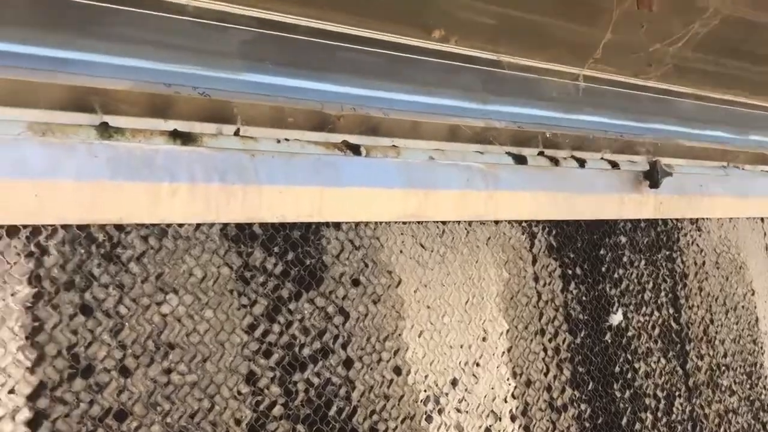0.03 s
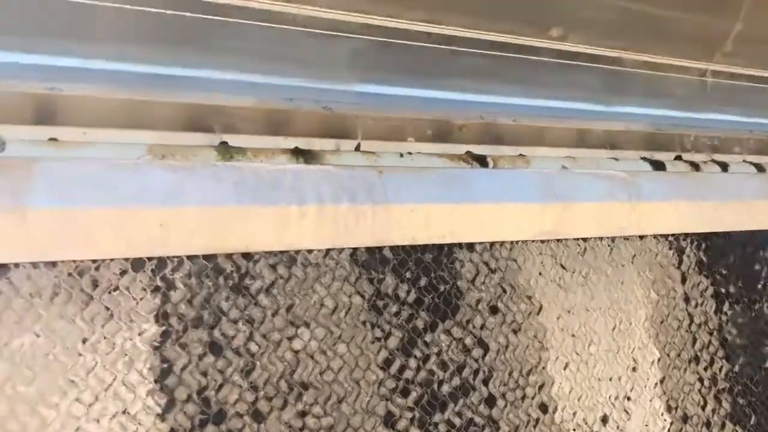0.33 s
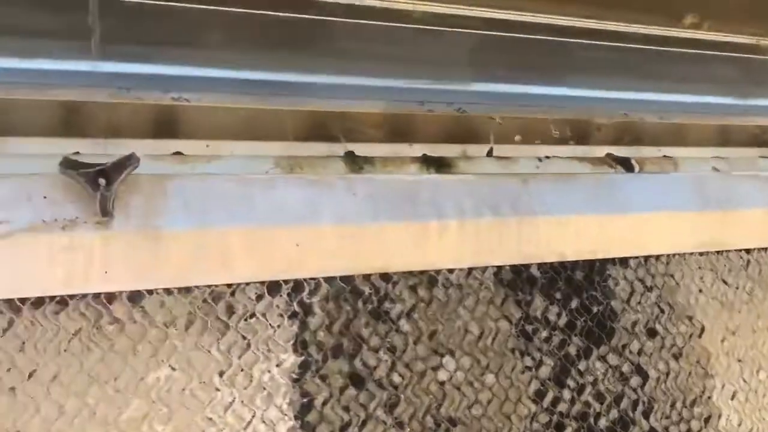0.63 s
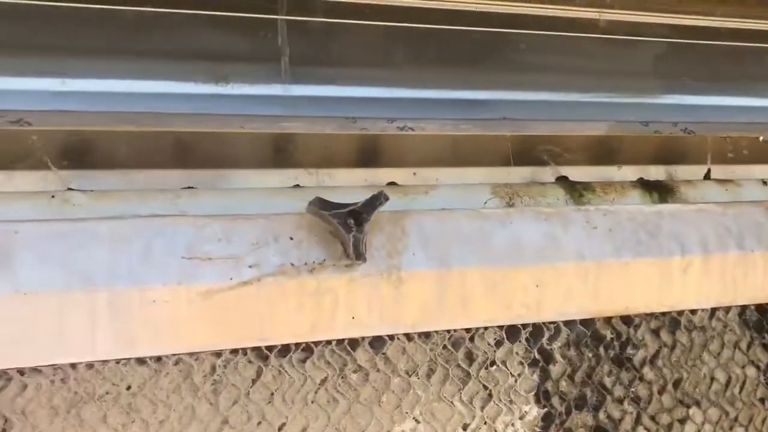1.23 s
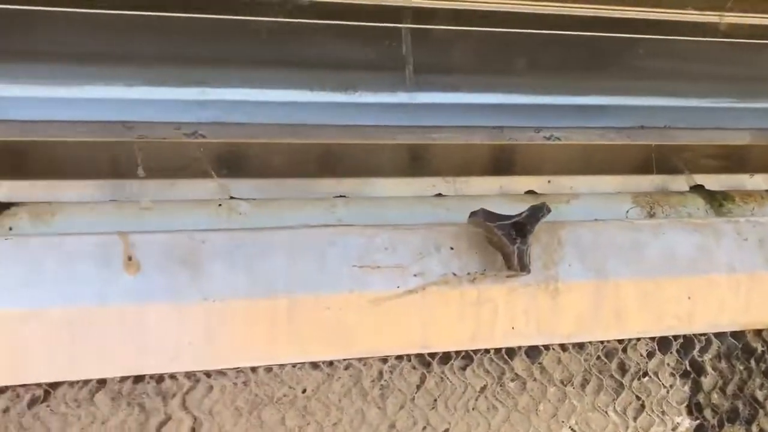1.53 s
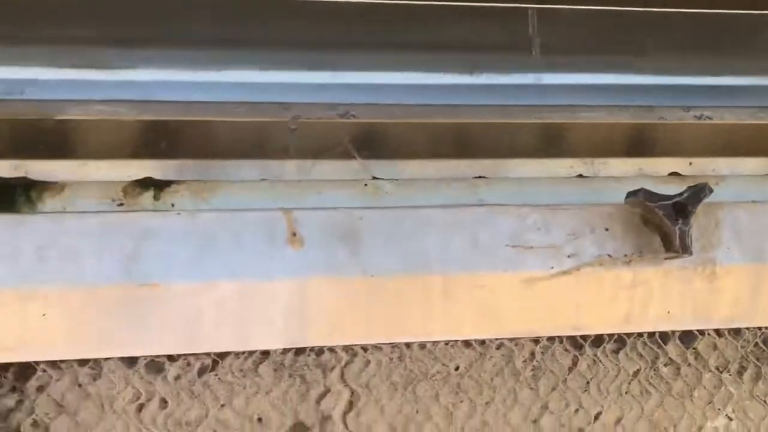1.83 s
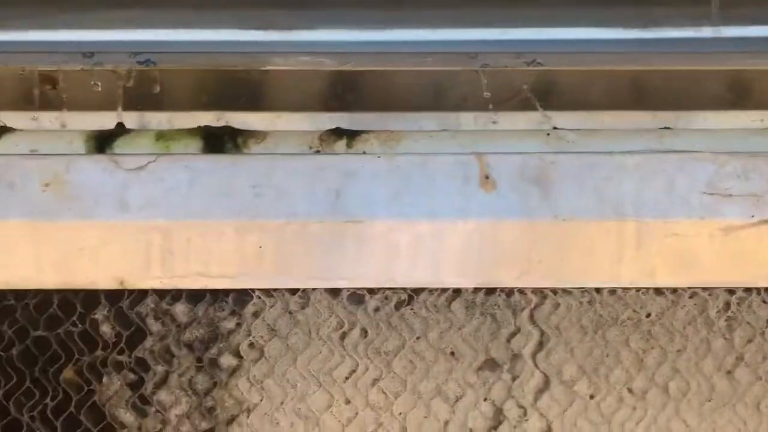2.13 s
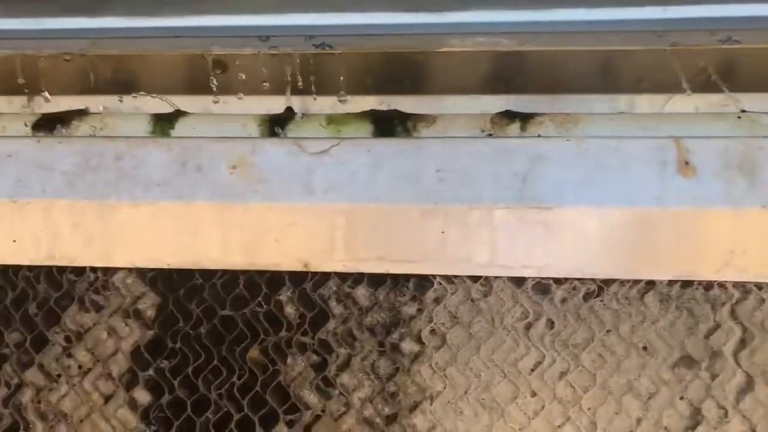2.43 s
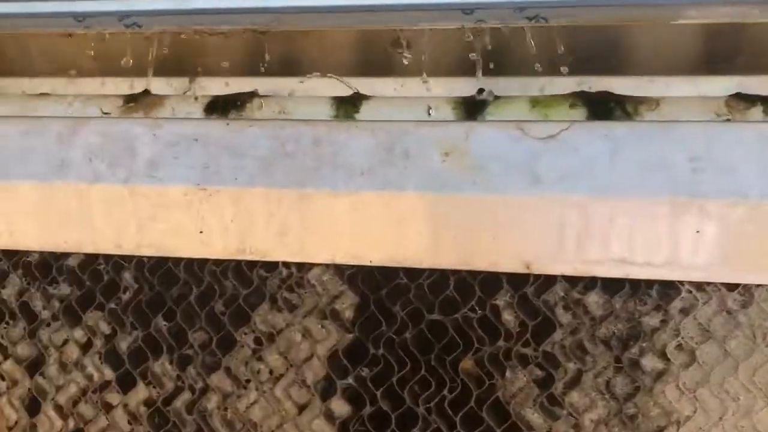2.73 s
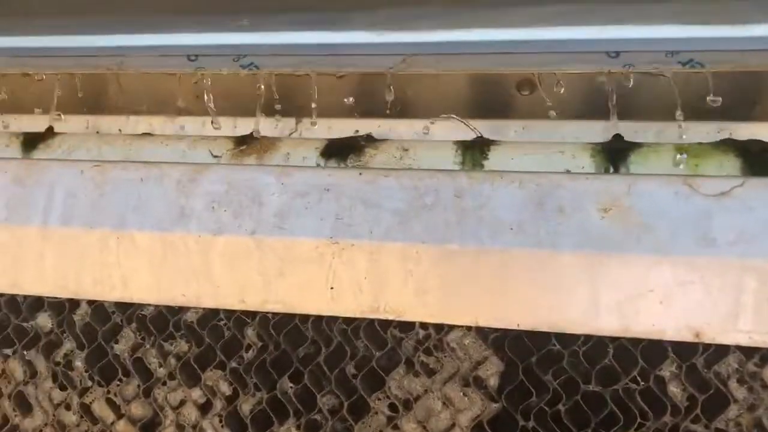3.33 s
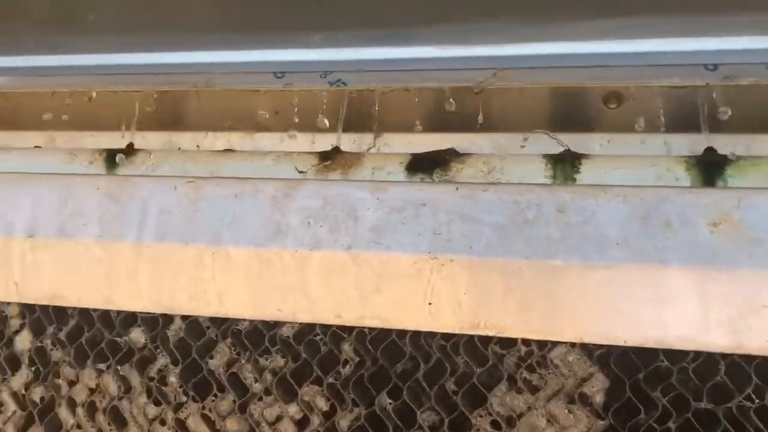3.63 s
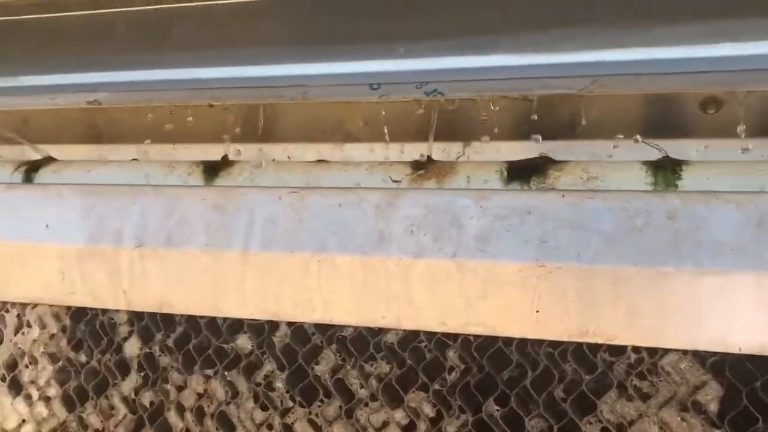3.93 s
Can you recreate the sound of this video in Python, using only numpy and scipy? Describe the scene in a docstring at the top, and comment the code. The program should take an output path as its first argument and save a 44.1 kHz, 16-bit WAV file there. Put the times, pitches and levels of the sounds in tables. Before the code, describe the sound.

Low wind thumps hit a microphone close to a farm building's wet cooling pads, die down, then build into a strong rumble. Underneath are a rhythmic fan rub, a soft airy hiss, a few faint squeaks and small drips.

```python
"""Wind buffets a microphone beside the wet cooling pads of a ventilated farm building.
Turbulent pressure at the microphone's port comes in puffs, then in a long gust that works the limiter.
Behind it a rasp, probably a fan drive rubbing, swells once per turn. Air and water hiss through
the pads, drops tick and splash, and a few faint squeaks glide in pitch."""
import sys
import numpy as np
from scipy import signal
from scipy.fft import rfft, irfft
from scipy.io import wavfile
from scipy.ndimage import uniform_filter1d, minimum_filter1d

SR = 44100
rng = np.random.default_rng(int(sys.argv[2]) if len(sys.argv) > 2 else 0)


def to_wav(sig):
    """Store sig (one row per channel, or 1-D mono) as 16-bit WAV at the path in sys.argv[1].

    Samples outside -1..1 are clipped; the rate is SR.
    """
    pcm = np.clip(np.atleast_2d(sig), -1, 1) * 32767
    pcm = np.round(pcm).astype(np.int16)
    wavfile.write(sys.argv[1], SR, pcm.T)  # frames by channels


N = 176400
TIME = np.arange(N) / SR


def from_db(db):
    """Amplitude grows tenfold for every 20 dB."""
    return 10 ** (np.asarray(db) / 20)


def rms_one(x):
    """Normalisation to unit rms."""
    return x / np.sqrt(np.mean(x ** 2) + 1e-20)


def in_time(rows):
    """Linear interpolation of a table at every sample."""
    return np.interp(TIME, *np.transpose(rows))


def at_hz(rows, hz):
    """Interpolation of a table on a logarithmic frequency axis."""
    freqs, values = np.transpose(rows)
    return np.interp(np.log(hz), np.log(freqs), values)


def cut(x, hz, kind, order=2):
    """A Butterworth filter, maximally flat in its passband."""
    sos = signal.butter(order, np.clip(hz, 10, .45 * SR), kind, fs=SR, output="sos")
    return signal.sosfilt(sos, x + 1e-18)


def drift(corner_hz):
    """Low-passed noise gives a random fluctuation of unit rms."""
    pole = np.exp(-80 * np.pi * corner_hz / SR)
    slow = signal.lfilter([1], [1, -2 * pole, pole * pole], rng.standard_normal(N // 40 + 2002))[2000:]
    return np.interp(np.arange(N) / 40, np.arange(len(slow)), rms_one(slow))


def hiss(spectrum):
    """Spectral shaping colours white noise; unit rms."""
    hz = np.maximum(np.arange(N // 2 + 1) * SR / N, 1)
    return rms_one(irfft(rfft(rng.standard_normal(N)) * from_db(at_hz(spectrum, hz)), N))


def resonance(hz, width_hz):
    """A randomly driven resonance gives narrow-band noise, whose centre may move; unit rms."""
    a, b = cut(rng.standard_normal((2, N)), width_hz / 2, "low")
    phase = 2 * np.pi * np.cumsum(hz * np.ones(N)) / SR
    return rms_one(a * np.cos(phase) + b * np.sin(phase))


def evened(x, span_s):
    """Division by the running rms flattens the envelope."""
    return x / np.sqrt(np.abs(uniform_filter1d(x ** 2, max(int(span_s * SR), 2))) + 1e-12)


def steady_band(low_hz, high_hz, span_s):
    """Band-limited noise with a flattened envelope."""
    return evened(cut(rng.standard_normal(N + SR), [low_hz, high_hz], "band", order=3)[SR:], span_s)


def burst(start, length, rise_s, fall_s):
    """An envelope of linear attack, hold and exponential decay."""
    age = TIME - start
    return np.clip(age / rise_s, 0, 1) * np.exp(-np.maximum(age - length, 0) / fall_s)


# Each row: frequency in Hz, relative spectral density of the hiss in dB.
PAD_SPECTRUM = [(60, 23), (200, 8), (500, 5.5), (1000, 3.5), (2000, 2), (3000, 2), (4000, 3), (6500, -9.5),
                (8200, -14), (12000, -29.5), (15500, -26)]
# Each row: time in seconds, level of the spray near the leaking pipe in dB.
SPRAY_LEVEL = [(0, -67), (.7, -76), (1.9, -74), (2.5, -68), (4, -71)]


def pads():
    """Flow noise: air and water hiss steadily through the pads, with fine spray on top."""
    spray = rms_one(cut(rng.standard_normal(N), [7500, 13500], "band"))
    return from_db(-46) * hiss(PAD_SPECTRUM) + from_db(in_time(SPRAY_LEVEL)) * spray


# Each row: start in seconds, level in dB, lower and upper band edges in Hz.
TICKS = [(.186, -45, 8000, 13500), (.76, -51, 11000, 14500), (.9, -55, 8000, 12760),
         (1.148, -43.5, 8200, 11300), (2.345, -45, 10500, 15500), (2.454, -38.5, 7900, 14400),
         (2.711, -38, 11500, 15800), (2.906, -45, 9500, 13000), (3.1, -46, 7000, 15000),
         (3.16, -49, 11000, 15500), (3.452, -48, 12500, 15800), (3.883, -43.5, 7000, 12500)]


def ticks():
    """Impact noise: each drop striking the gutter gives a brief, bright burst."""
    out = 0
    for start, db, low_hz, high_hz in TICKS:
        treble = cut(rng.standard_normal(N), low_hz, "high", order=6)
        band = rms_one(cut(treble, high_hz, "low", order=8))
        out += from_db(db) * np.tanh(band / 2) * burst(start, 0.006, rise_s=0.00078, fall_s=0.0028)
    return out


# Each row: start in seconds, level in dB, length in seconds, frequency in Hz.
SPLASHES = [(2.443, -44.5, 0.032, 4800), (3.116, -48, 0.026, 5770), (3.459, -43, .028, 5500)]


def splashes():
    """Small splashes radiate band-limited noise with a soft attack."""
    out = 0
    for start, db, length, hz in SPLASHES:
        band = rms_one(cut(rng.standard_normal(N), [hz * 0.81, hz * 1.07], "band"))
        out += from_db(db) * band * burst(start, length, rise_s=0.0086, fall_s=0.014)
    return out


# Each row: time in seconds, typical level of a drip in dB.
DRIP_LEVEL = [(0, -63), (1.8, -63), (2.6, -57), (4, -50)]
DRIPS_PER_S = 60


def patter():
    """Drips arrive as a Poisson process, louder as the leaking pipe comes near."""
    arrivals = rng.random(N) < DRIPS_PER_S / SR
    impacts = arrivals * from_db(in_time(DRIP_LEVEL) + 3 * rng.standard_normal(N))
    envelope = signal.lfilter([1], [1, -np.exp(-1 / (0.0056 * SR))], impacts + 1e-18)  # 5.6 ms decay
    return envelope * cut(rng.standard_normal(N), 5000, "high")


# Each row: start and length in seconds, first and last frequency in Hz, peak level in dB.
SQUEAKS = [(0.924, 0.038, 1420, 1246, -39), (0.944, 0.058, 1170, 737, -44), (1.055, 0.014, 705, 1220, -39),
           (1.056, 0.028, 1600, 1400, -41), (1.136, 0.043, 1570, 580, -40.5),
           (1.158, 0.026, 1750, 1340, -45)]


def squeaks():
    """Random frequency modulation roughens short gliding tones."""
    out, waver = 0, 1 + 0.059 * drift(223)
    for start, length, first_hz, last_hz, db in SQUEAKS:
        progress = np.clip((TIME - start) / length, 0, 1)
        hz = (first_hz + (last_hz - first_hz) * progress) * waver
        out += from_db(db) * np.sin(np.pi * progress) * np.sin(2 * np.pi * np.cumsum(hz) / SR)
    return out


TURNS_PER_S, FIRST_SWELL_S = 6.1, 0.066


def swell(rise_s, fall_s):
    """Incoherent sounds add in power: each turn's rub overlaps the tail of the one before."""
    age = (TIME - FIRST_SWELL_S) % (1 / TURNS_PER_S)
    ages = np.array([age, age + 1 / TURNS_PER_S])
    envelopes = np.clip(ages / rise_s, 0, 1) * np.exp(-np.maximum(ages - rise_s, 0) / fall_s)
    return np.hypot(*envelopes)


# Each row: frequency in Hz, relative spectral density of the rubbing in dB.
RASP_SPECTRUM = [(1200, -0.5), (2000, -1.5), (2900, 1), (3700, 3), (4400, 5), (5500, 0.5), (7000, 1.5),
                 (8200, -10.5), (10600, -10), (13000, -23), (15500, -37)]
# Each row: time in seconds, level of the broadband rubbing in dB as the listener moves.
RASP_LEVEL = [(0, -41), (.3, -43), (.65, -46), (1.0, -48.5), (1.6, -47.5), (2.0, -46.5), (2.5, -46),
              (3.2, -48), (4, -46.5)]
# The strongest spectral hump sinks as the listener walks. Each row: time in seconds, centre in Hz.
HUMP_HZ = [(0, 4500), (.45, 4120), (1.0, 3760), (1.8, 3550), (2.4, 3430), (4, 3500)]
# Each row: time in seconds, level of that hump in dB.
HUMP_LEVEL = [(0, -49), (.5, -49.5), (1.6, -46.5), (2.3, -49.5), (3.0, -50), (4, -50.5)]
# Each row: frequency and bandwidth in Hz, level in dB, rise and decay times in seconds.
METAL_MODES = [(3310, 53, -58, 0.071, 0.051), (3420, 200, -56, .035, 0.11), (6400, 370, -60.5, 0.039, 0.17),
               (10100, 81, -67.5, .006, 0.081), (10100, 990, -69.5, 0.022, 0.073),
               (15000, 1200, -71, .02, .06)]


def fan_rasp():
    """Friction noise swells once per turn and excites resonances of the metal; its level flickers."""
    friction = from_db(in_time(RASP_LEVEL)) * hiss(RASP_SPECTRUM)
    hump = from_db(in_time(HUMP_LEVEL)) * resonance(in_time(HUMP_HZ), width_hz=840)
    rasp = (friction + hump) * swell(rise_s=0.039, fall_s=0.078)
    for hz, width_hz, db, rise_s, fall_s in METAL_MODES:
        rasp += from_db(db) * resonance(hz, width_hz) * swell(rise_s, fall_s)
    return rasp * from_db(1.34 * drift(40))


# Each row: time in seconds, level in dB about which the rumble flutters.
RUMBLE_LEVEL = [(0, -24), (.12, -18.5), (.2, -33.5), (.3, -18), (.4, -34), (.58, -28), (.7, -42),
                (.95, -41), (1.3, -39.5), (1.75, -36.5), (2.05, -42.5), (2.28, -38.5), (2.38, -16.5),
                (2.6, -23.5), (2.85, -22), (3.2, -20.5), (4, -16)]


def rumble():
    """Large, slow eddies press on the port and give the lowest frequencies."""
    air = steady_band(51.8, 109, span_s=0.02)
    flutter_db = 4.5 * evened(drift(5.7), 0.29)
    return air * from_db(in_time(RUMBLE_LEVEL) + flutter_db)


# Each row: time of the centre in seconds, level in dB, width in seconds.
POPS = [(.004, -12.5, 0.0005), (0.073, -3.5, 0.0011), (.117, -4.5, 0.00061), (.201, -8, 0.00087),
        (.875, -12.5, 0.0011), (1.741, -10.5, 0.00087), (2.435, -9.5, 0.00091), (2.503, -12, 0.00037),
        (2.591, -15, 0.00051), (2.735, -8, 0.00063), (2.768, -4.5, 0.00052), (2.796, -8.5, 0.00038),
        (2.821, -3.5, 0.0003), (2.827, 2, 0.0006), (2.891, -6, 0.00045), (2.911, -33, 0.00076),
        (2.924, -6, 0.00032), (3.014, -11, 0.00039), (3.049, -14, 0.00033), (3.094, -9, 0.00053),
        (3.151, -6.5, 0.0004), (3.221, -9.5, 0.00042), (3.27, -7.5, 0.00054), (3.297, -7, 0.00047),
        (3.403, 2, 0.00088), (3.531, -16, 0.001), (3.654, -8, 0.00052), (3.797, -6, 0.00059),
        (3.892, -11, 0.00044), (3.937, -2.5, 0.00066)]
PORT_HZ = 71.4


def pops():
    """A lone eddy passing the port gives a bipolar pulse: suction, then pressure."""
    out = 0
    for centre, db, width in POPS:
        u = (TIME - centre) / width
        out += from_db(db) * 2 * u / (1 + u * u / 2) ** 3
    return cut(out, PORT_HZ, "high")


# Each row: start in seconds, level in dB, length in seconds, low-pass corner in Hz.
PUFFS = [(0.0, -33, 0.0081, 580), (.07, -9, 0.0058, 624), (0.102, -19, 0.044, 714),
         (0.185, -20.5, 0.036, 835), (0.284, -15.5, 0.021, 516), (0.411, -18.5, 0.0097, 516),
         (0.493, -24.5, 0.013, 556), (0.592, -30.5, 0.036, 598), (0.72, -27, 0.036, 453),
         (1.081, -36, 0.018, 350), (1.324, -41.5, 0.019, 326), (1.39, -34, 0.013, 320),
         (1.438, -41.5, .02, 400), (1.496, -35.5, 0.026, 390), (1.569, -25.5, 0.023, 700),
         (1.663, -22.5, 0.027, 510), (1.844, -30.5, 0.017, 460), (1.929, -28.5, 0.032, 372),
         (2.061, -32, 0.031, 407), (2.244, -25.5, 0.013, 390), (2.351, -24, 0.018, 500),
         (2.501, -20.5, 0.02, 880), (2.622, -16, 0.019, 616), (2.727, -13, 0.015, 736),
         (2.763, -13.5, 0.024, 860), (2.812, -6, 0.011, 1150), (2.891, -22.5, 0.04, 960),
         (3.298, -19, 0.058, 850), (3.864, -32, 0.037, 646)]
PUFF_LOW_HZ, PUFF_FALL_S = 109, 0.0022


def puffs():
    """Each knot of turbulence has its own bandwidth and shoves the air at the port into a low thump."""
    out = 0
    low_air = from_db(1.5) * evened(cut(rng.standard_normal(N), [57, 157], "band"), 0.049)
    for start, db, length, top_hz in PUFFS:
        air = cut(rng.standard_normal(N), top_hz, "low", order=3)
        air = cut(air, [PUFF_LOW_HZ, max(top_hz * 0.44, PUFF_LOW_HZ * 2)], "band", order=1)
        puff = evened(air, 0.014) * burst(start, length - PUFF_FALL_S, 0.0018, PUFF_FALL_S)
        thump = low_air * burst(start, length, rise_s=0.024, fall_s=0.004)
        out += from_db(db) * (puff + thump)
    return out


# Each row: time in seconds, strength of the draught in dB relative to the full gust.
DRAUGHT = [(0, 0.5), (.05, -8), (.115, -.5), (.17, -12.5), (.235, -4.5), (.27, -12.5), (.36, -11),
           (.58, -13.5), (.68, -17), (.85, -18), (.96, -23), (1.3, -21), (1.55, -17), (1.85, -18),
           (2.02, -24.5), (2.28, -18.5), (2.4, -7.5), (2.68, -3.5), (2.78, 0), (3.0, 1.5), (3.24, -1.45),
           (3.35, 0), (3.7, -2.5), (4, -1.5)]
# Each row: frequency in Hz, relative spectral density of the full gust in dB.
GUST_SPECTRUM = [(25, -18), (40, -12.5), (65, -4), (110, 3.5), (200, 1), (400, -8.5), (750, -19.5),
                 (1200, -38.5), (1800, -60.5), (2800, -56)]
# Each row: frequency in Hz, dB gained per dB of draught.
GROWTH = [(30, -0.5), (65, 1.0), (125, 1.43), (250, 1.66), (500, 2.06), (1500, 4.11)]
# Tiny, fast eddies crackle in the upper bands. Each row: frequency in Hz, spread of level in dB.
CRACKLE = [(150, .4), (500, 1.6), (1000, 3.6), (2000, 3.6)]
GUST_DB, EDDY_SPREAD_DB = -13, 2.19


def buffeting():
    """Turbulent pressure grows faster with the flow at high frequencies, so strong wind is brighter."""
    strength_db = in_time(DRAUGHT) + EDDY_SPREAD_DB * evened(drift(65), 0.092)
    crackle = evened(drift(190), 0.067)
    edges_hz = 22 * 2 ** np.arange(0, 7.5, .5)  # half octaves
    out, power = 0, 0
    for low, high in zip(edges_hz, edges_hz[1:]):
        hz = np.sqrt(low * high)
        gain = from_db(at_hz(GUST_SPECTRUM, hz)) * np.sqrt(high - low)
        band = steady_band(low, high, span_s=0.049)
        level_db = strength_db * at_hz(GROWTH, hz) + crackle * at_hz(CRACKLE, hz)
        out += gain * band * from_db(level_db + drift(35))  # each band also wanders by 1 dB
        power += gain ** 2
    return from_db(GUST_DB) * out / np.sqrt(power)


def scene():
    """Superposition: wind, high-passed by the microphone, adds to the fan, the pads and the water."""
    wind = cut(rumble() + buffeting() + puffs() + pops(), 41.3, "high", order=3)
    return (wind + fan_rasp() + pads() + ticks() + splashes() + patter() + squeaks())[None]


CEILING_DB, RELEASE_DB_PER_S, LOOK_AHEAD_S = -1.5, 121, 0.0058
SATURATION_DB, CUTOFF_HZ = -2.9, 15800


def record(dry):
    """Limiting ducks everything under strong buffets; saturation rounds peaks; the top is filtered off."""
    excess_db = np.maximum(20 * np.log10(np.abs(dry[0]) + 1e-9) - CEILING_DB, 0)
    release_db = RELEASE_DB_PER_S * TIME
    reduction_db = np.maximum.accumulate(excess_db + release_db) - release_db
    span = int(LOOK_AHEAD_S * SR)
    limited = dry * from_db(uniform_filter1d(minimum_filter1d(-reduction_db, span), span))
    rounded = limited / (1 + (limited / from_db(SATURATION_DB)) ** 6) ** (1 / 6)
    return signal.sosfilt(signal.ellip(12, .1, 80, CUTOFF_HZ, fs=SR, output="sos"), rounded)


dry = scene()
out = record(dry)
to_wav(out)
```